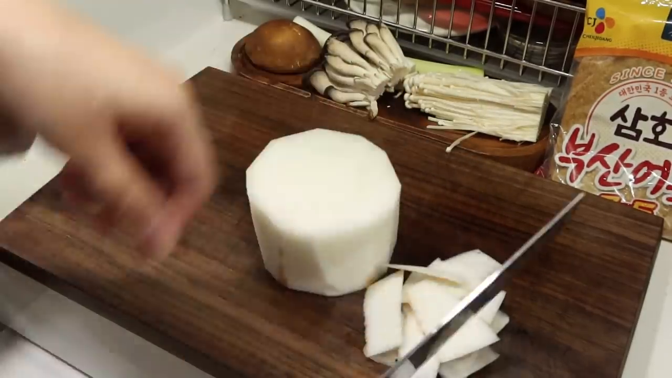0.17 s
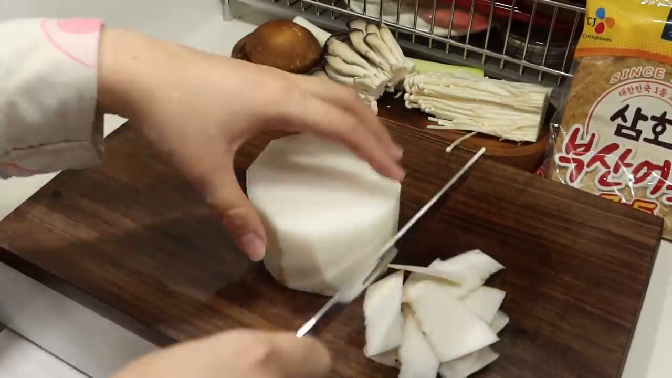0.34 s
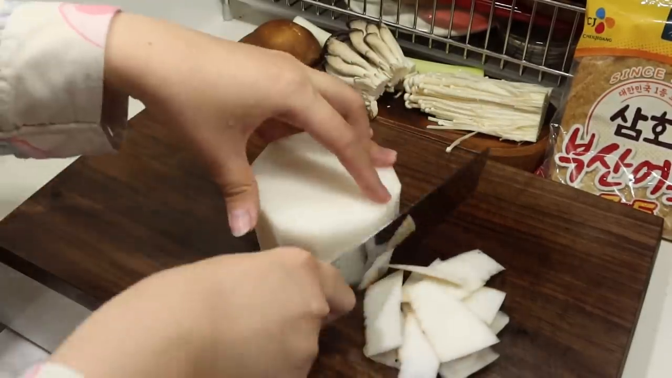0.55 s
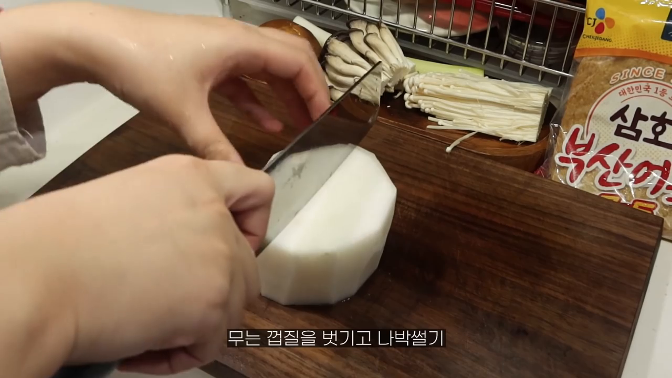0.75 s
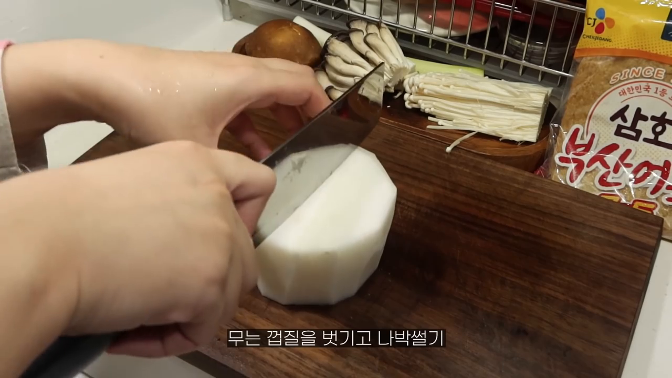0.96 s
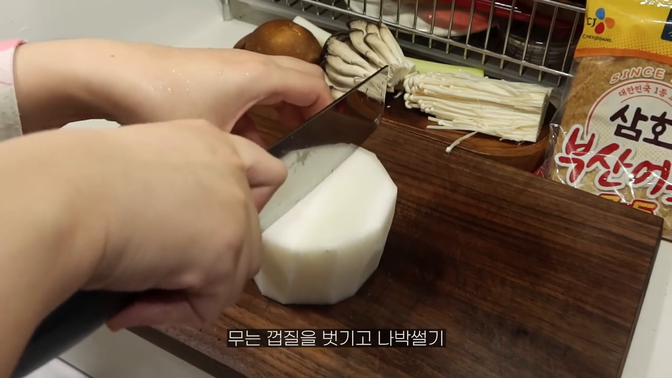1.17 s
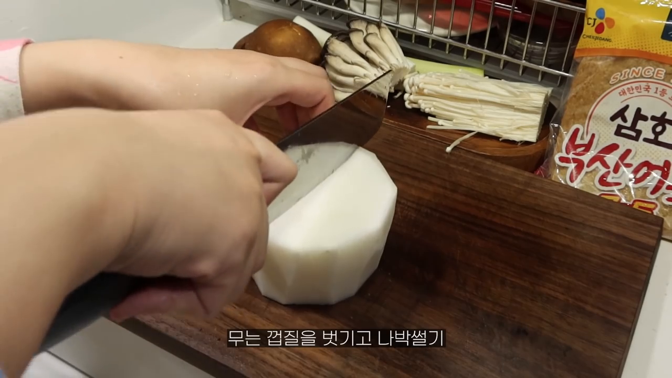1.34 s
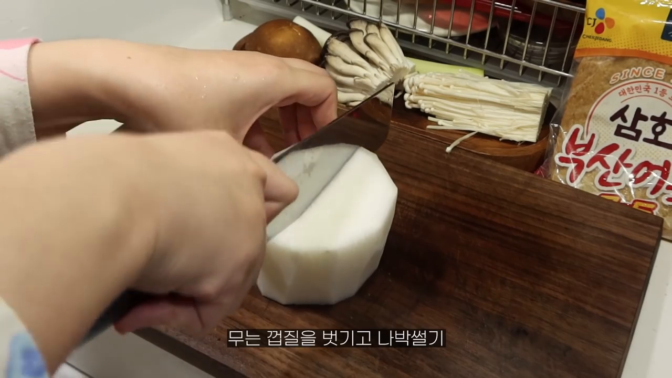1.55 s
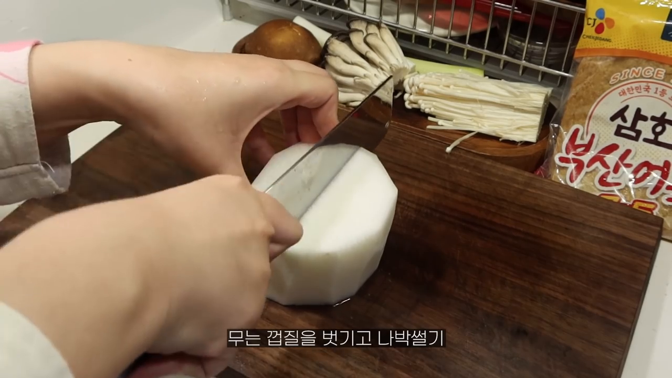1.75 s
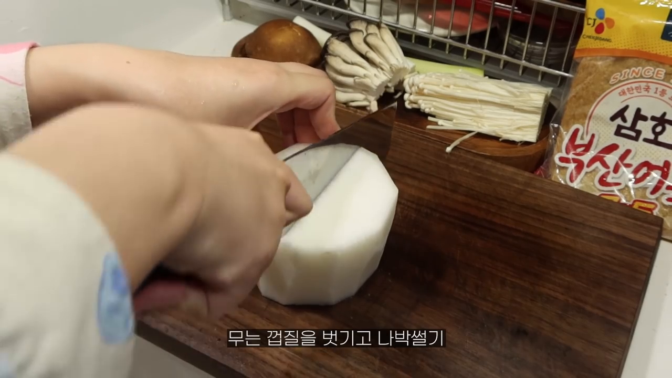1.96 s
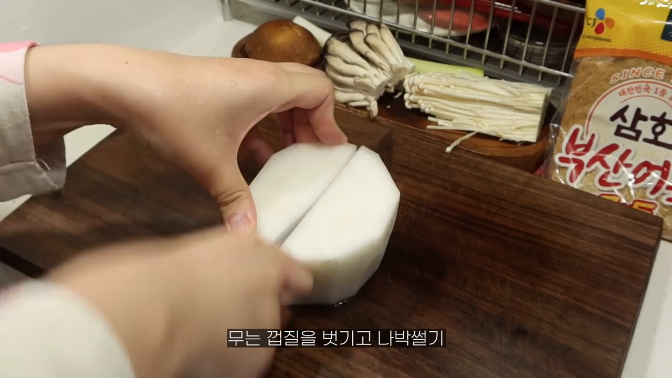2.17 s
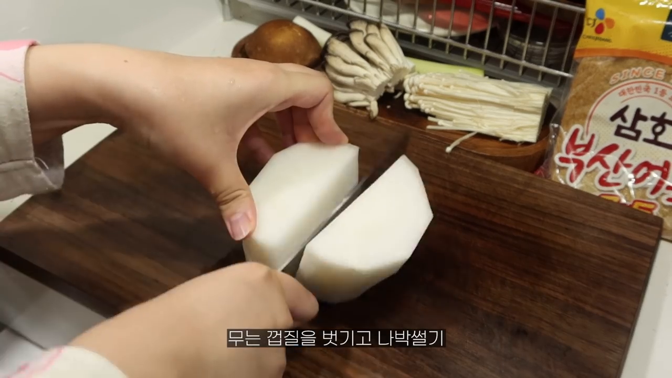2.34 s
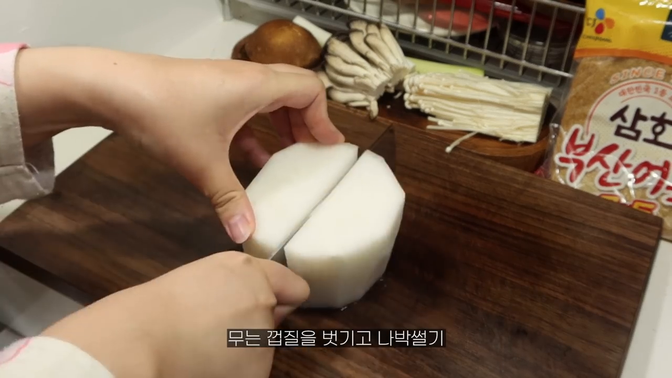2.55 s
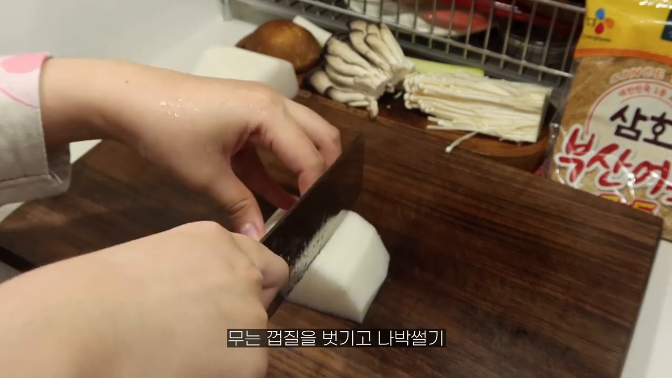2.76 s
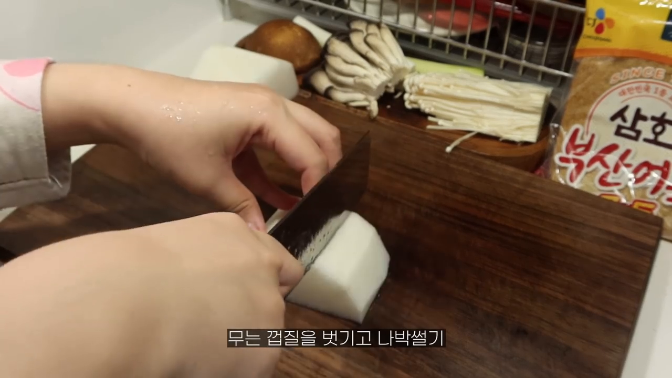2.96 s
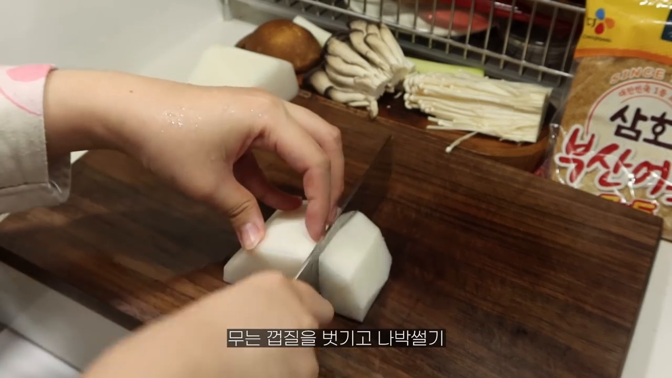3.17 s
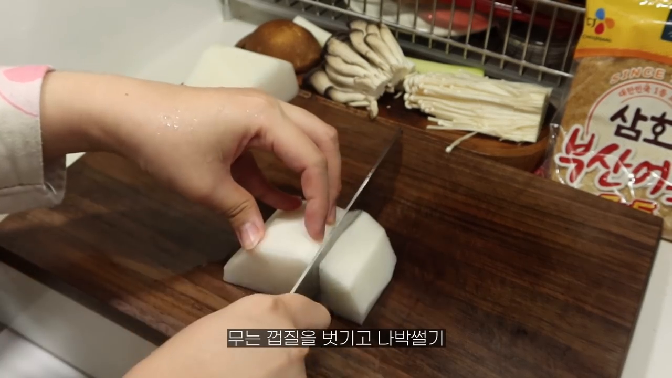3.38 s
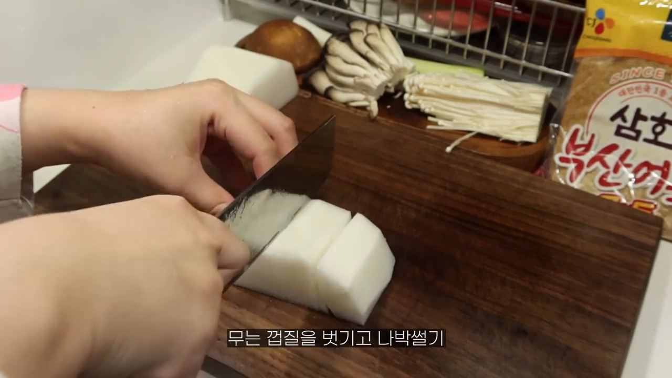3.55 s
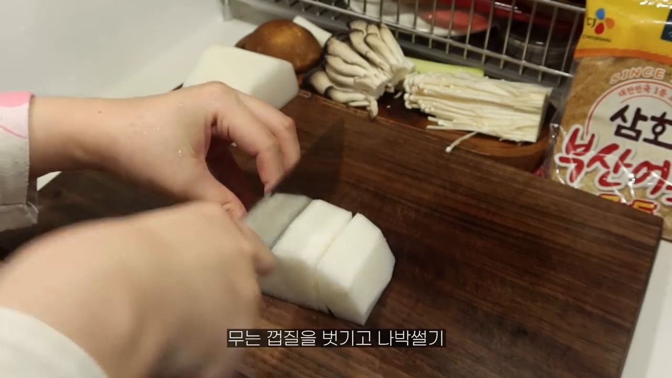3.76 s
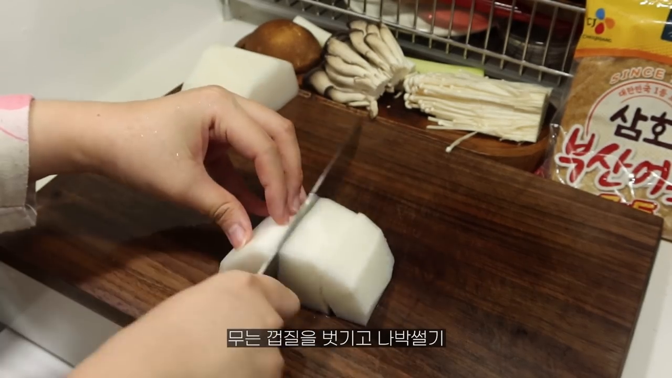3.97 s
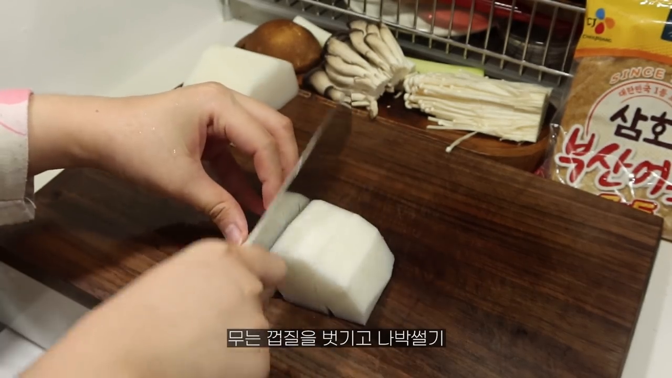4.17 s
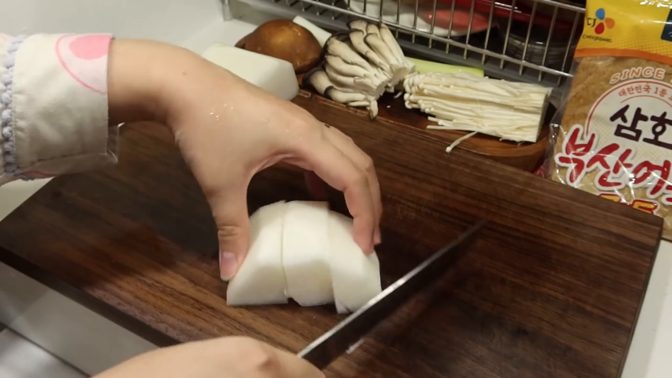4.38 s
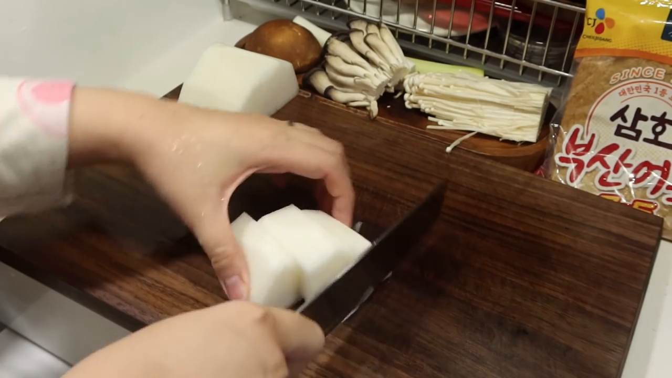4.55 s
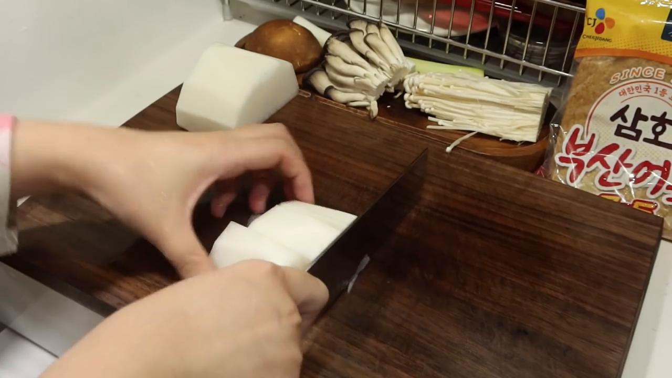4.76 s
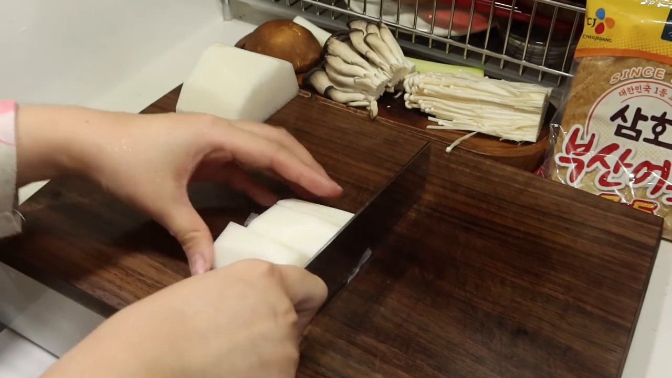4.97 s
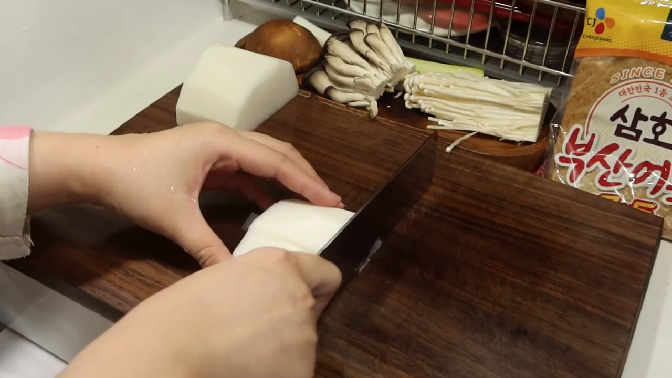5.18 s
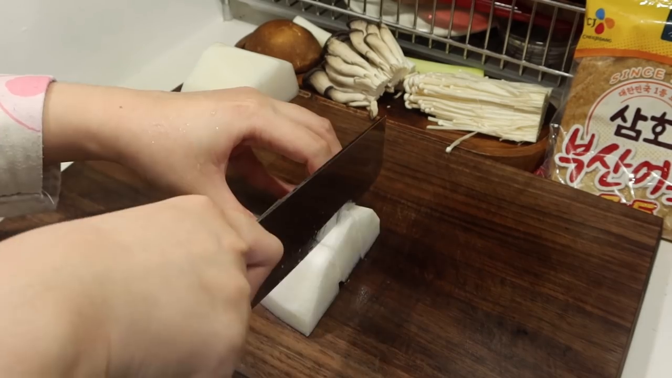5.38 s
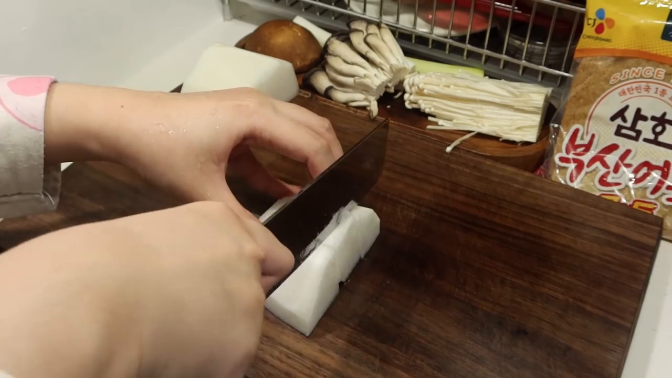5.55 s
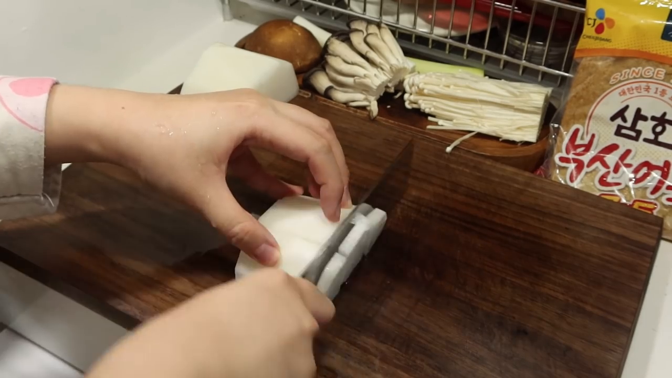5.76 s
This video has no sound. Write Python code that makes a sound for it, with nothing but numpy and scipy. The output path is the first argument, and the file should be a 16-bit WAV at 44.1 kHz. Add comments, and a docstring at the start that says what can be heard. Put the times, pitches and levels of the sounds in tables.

```python
"""In a kitchen, a knife saws through a thick raw radish and chops it on a wooden board, close to the microphone.
Cuts are swelling crunches of bursting cells, made of coloured random clicks; most end as the blade knocks
on the board, a sum of decaying modes set off by a brief push. Wet pieces tick (noise bursts), slide (random
clicks) and squeak (overtone stacks). Filtered noise and a mains hum lie beneath, and sparse taps give the echo.
The loud chops overload the recorder, whose limiter ducks and lets the kitchen's echo swell back."""
import sys
import numpy as np
from scipy import signal
from scipy.fft import rfft, irfft
from scipy.io import wavfile
from scipy.ndimage import uniform_filter1d

SR = 44100
rng = np.random.default_rng(int(sys.argv[2]) if len(sys.argv) > 2 else 0)


def log_audio(samples):
    """Write samples as a 16-bit WAV file to the path given in sys.argv[1]."""
    # one column per channel
    frames = np.atleast_2d(samples).T
    # limit to full scale, then quantise
    limited = np.clip(frames, -1, 1)
    pcm = np.round(limited * 32767).astype(np.int16)
    wavfile.write(sys.argv[1], SR, pcm)


N = 256662
TIME = np.arange(N) / SR  # s
MONO_FROM_S = 0.768  # the stereo image has closed by then
NOTCH_HZ = 305  # a dip in the knocks' spectrum, thinning them near 300 Hz


def gain_of(db):
    """Level to amplitude: 20 dB is a factor of ten."""
    return 10 ** (np.asarray(db) / 20)


def evened(x):
    """Normalization of the mean power: scales x to rms 1."""
    return x / np.sqrt(np.mean(x ** 2) + 1e-20)


def read(points, hz):
    """Interpolates a table on a logarithmic frequency axis."""
    f, value = np.transpose(points)
    return np.interp(np.log(hz + 1), np.log(f + 1), value)


def coloured(x, spectrum):
    """Spectral shaping: multiplies the Fourier spectrum of x by a curve, then sets rms 1."""
    hz = np.fft.rfftfreq(len(x), 1 / SR)
    return evened(irfft(rfft(x) * gain_of(read(spectrum, hz)), len(x)))


def add(mix, s, sound):
    """Superposition: mixes a sound in at time s."""
    part = mix[max(round(s * SR), 0):][:len(sound)]
    part += sound[:len(part)]


def grains(per_s, spread_db):
    """Shot noise: a random train of one-sample clicks of uneven size and random sign."""
    size = gain_of(spread_db * np.minimum(rng.exponential(1, N), 4))
    happens = rng.random(N) < per_s / SR
    return evened(size * rng.choice([-1., 1.], N) * happens)


def patchy(x, depth_db):
    """Time-varying resonance: wet gaps keep changing shape, so their resonances come and go."""
    z = signal.stft(x, nperseg=256)[2]
    field = uniform_filter1d(rng.standard_normal(z.shape), size=4, axis=0)  # smooth over frequency
    field = evened(uniform_filter1d(field, size=7, axis=1))  # and over time
    return evened(signal.istft(z * gain_of(depth_db * field), nperseg=256)[1][:N])


def arch(start, length):
    """Kinematics of a hand movement: speed, 0-1, gathers, peaks early and comes to rest."""
    skew, power = 0.67, 1.03
    done = np.clip((TIME - start) / length, 0, 1)
    return abs(np.sin(np.pi * done ** skew)) ** power


def smoothed(x, seconds):
    """First-order relaxation: follows x with a lag."""
    keep = np.exp(-1 / (seconds * SR))
    return signal.lfilter([1 - keep], [1, -keep], x)


def floor():
    """Stationary noise: room rumble and hiss, with a faint 60 Hz mains hum."""
    # spectrum of the quiet kitchen: frequency_hz, level_db (per Hz, relative)
    quiet_spectrum = [(20, -3), (55, -2.5), (90, 0), (150, 1), (280, -3), (450, -2.5), (650, -9.5),
                      (1200, -11), (3000, -15.5), (7000, -18.5), (12000, -22), (16000, -25.5)]
    air = gain_of(-51.5) * coloured(rng.standard_normal(N), quiet_spectrum)
    return air + gain_of(-62) * np.sin(2 * np.pi * (60 * TIME + rng.random()))


def blade():
    """Friction and fracture follow blade speed: strokes swell and fade, cuts grow until the blade is through."""
    # the blade drawn slowly to or fro in the flesh: start_s, length_s, crunch_db, drag_db (on the board, relative)
    strokes = [(0.552, 0.048, -46.5, -48), (1.466, 0.15, -39, -41), (1.608, 0.1, -31, -30),
               (1.704, 0.15, -38, -35), (1.823, 0.1, -42.5, -41), (1.94, 0.22, -39, -40),
               (2.234, 0.14, -28, -52), (2.93, .17, -57, -47.5), (5.575, 0.1, -58.5, -45.5),
               (5.686, 0.17, -38.5, -35.5)]
    # the blade pushed right through: through_s, length_s, split_s (how long before through the flesh splits),
    # final_crunch_db, final_drag_db (on the board, relative)
    cuts = [(0.071, 0.029, 0.0087, -26, -30.5), (0.625, 0.037, 0.0083, -33, -41),
            (2.265, 0.076, 0.049, -12, -29), (3.261, 0.22, 0.03, -11, -28),
            (3.919, 0.17, 0.038, -11.5, -27), (5.85, .19, 0.046, -15.5, -25)]
    enter_s, stop_s = .02, .002  # the edge bites in, and is stopped
    crunch_growth_db_per_s, drag_growth_db_per_s = 179, 105  # both grow as the blade gathers speed
    split_rise_s, split_db = 0.0073, 9.5  # the crunch jumps when the flesh splits
    crunch = sum(gain_of(db) * arch(start, length) for start, length, db, _ in strokes)
    drag = sum(gain_of(db) * arch(start, length) for start, length, _, db in strokes)
    for end, length, split, crunch_db, drag_db in cuts:
        to_go = np.maximum(end - TIME, 0)
        entering = np.clip((length - to_go) / enter_s, 0, 1)
        inside = entering * np.clip(1 - (TIME - end) / stop_s, 0, 1)
        unsplit = .5 + .5 * np.tanh((to_go - split) / split_rise_s)
        cut_db = crunch_db - crunch_growth_db_per_s * to_go - split_db * unsplit
        crunch = np.hypot(crunch, inside * gain_of(cut_db))  # powers add
        drag = np.hypot(drag, inside * gain_of(drag_db - drag_growth_db_per_s * to_go))
    return crunch, drag


def cutting(fast_db=-26):
    """Fracture noise: cells burst under the edge, densely when it runs fast; the blade's drag shakes the board."""
    # spectra of slow and fast cell bursts: frequency_hz, level_db (per Hz, relative)
    slow_crunch = [(530, -67.5), (900, -20), (1080, -3), (1420, -11), (2340, -3), (3110, -7), (3810, -3.5),
                   (4660, -9.5), (6140, -2.5), (8770, -10.5), (12300, -10), (15600, -22.5)]
    fast_crunch = [(350, -23), (600, -4.5), (1150, -8.5), (1450, -23.5), (1690, 2), (1830, -3), (2280, -1),
                   (3160, 5.5), (4560, -1.5), (4950, 1.5), (5450, 0), (6680, 2), (7660, -4), (12900, -13.5),
                   (15600, -46)]
    # the board's rumble while the hand presses on it: frequency_hz, level_db (per Hz, relative)
    rumble = [(60, -15.5), (150, -17), (310, -17), (400, -1), (465, 2.5), (520, -9), (600, -22), (720, -5),
              (1100, -19), (1600, -23), (3000, -31.5)]
    crunch, drag = blade()
    fast = crunch ** 2 / (crunch ** 2 + gain_of(fast_db) ** 2)  # share of power, half at fast_db
    slow_cells = coloured(grains(per_s=5000, spread_db=1.5), slow_crunch)
    fast_cells = coloured(grains(per_s=14000, spread_db=3), fast_crunch)
    cells = crunch * patchy(np.sqrt(1 - fast) * slow_cells + np.sqrt(fast) * fast_cells, depth_db=1.2)
    shake = patchy(coloured(grains(per_s=600, spread_db=1.5), rumble), depth_db=2.0)
    return cells + gain_of(-2.0) * drag * shake


def ringing(modes, travel):
    """Modal decay with dispersion: low bending waves arrive later (travel = s at 1 kHz)."""
    out = np.zeros(SR // 3)
    for hz, db, t60 in modes:
        t = np.maximum(TIME[:len(out)] - travel * np.sqrt(1000 / hz), 0)
        out += gain_of(db - 60 * t / t60) * np.sin(2 * np.pi * hz * t)
    return out / np.linalg.norm(gain_of([db for _, db, _ in modes]))


def board_rings():
    """Damping by contact: the board ringing freely, and with low modes muted by a leaning hand."""
    # modes of the board, on a counter that hums on faintly: frequency_hz, level_db (relative), t60_s
    board_modes = [(115, -7.5, 0.12), (157.6, -3, 0.038), (229, -30.5, 0.079), (448.7, -4.5, 0.07),
                   (483, -0.5, 0.067), (528.6, -1, 0.048), (724, 4, 0.036), (817, -3, 0.038),
                   (867, -9, 0.084), (1145, 3, 0.036), (1280, 3.5, 0.025), (1520, -5, 0.047),
                   (1670, 0, 0.038), (1730, -13, 0.019), (2300, -24, .03), (2780, -27, .03), (468, -41, 1),
                   (595, -39, 0.74), (750, -33.5, 0.52), (1430, -47, 0.57)]
    lean_db, lean_below_hz = -7, 500
    muted = [(hz, db + lean_db * (NOTCH_HZ < hz < lean_below_hz), t60) for hz, db, t60 in board_modes]
    return ringing(board_modes, travel=0.00011), ringing(muted, travel=0.00013)


def knocks():
    """Impact excitation: a brief push rings the board, which radiates little bass; steel adds a dry clatter."""
    # blade or piece meets the board: start_s, force_db (relative), hardness_hz (1 / contact time),
    # clatter_db (relative to the force)
    impacts = [(0.0667, -20, 2100, 4), (0.07, 0, 550, -16), (0.6172, -22.5, 820, -6),
               (0.6232, -2, 615, -31.5), (1.324, -15, 470, -25.5), (1.930, -24, 630, -36),
               (2.2611, 16, 2270, -13.5), (2.596, -11, 347, -40), (2.616, 0.5, 233, -52),
               (2.734, -17.5, 330, -35), (3.2540, 15.5, 2210, -16), (3.9127, 17.5, 2230, -17),
               (4.463, -20, 440, -43), (4.691, -14, 660, -21.5), (4.8937, 2.5, 1250, -27.5),
               (5.169, -11.5, 464, -44), (5.56, -19, 620, -26.5), (5.642, -21.5, 450, -34)]
    # steel chattering against the wood: frequency_hz, level_db (per Hz, relative)
    clatter_spectrum = [(300, -28.5), (750, 4), (1300, 9), (1900, 2.5), (2600, -5), (3600, -14),
                        (8000, -30)]
    clatter_t60, radiate_hz = .085, 350  # s; the board radiates little below radiate_hz
    lean_from_s, lean_to_s = 2.2, 2.4  # the cook leans on the blade to halve the radish
    board, pressed_board = board_rings()
    out, t = np.zeros(N), TIME[:len(board)]
    for s, force_db, hard_hz, clatter_db in impacts:
        ring = pressed_board if lean_from_s < s < lean_to_s else board
        push = np.sin(np.pi * np.minimum(t * hard_hz, 1)) ** 2
        chatter = coloured(rng.standard_normal(len(t)), clatter_spectrum)
        chatter = chatter * gain_of(clatter_db - 60 * t / clatter_t60)
        rung = signal.fftconvolve(ring, push / push.sum())[:len(t)]
        add(out, s, gain_of(force_db) * (rung + chatter))
    out = signal.lfilter(*signal.iirnotch(NOTCH_HZ, 2, fs=SR), out)
    return signal.sosfilt(signal.butter(2, radiate_hz, "high", fs=SR, output="sos"), out)


def echo(x, t60s, colour, start):
    """Reverberation: sparse reflections of random sign from a start time on, each band dying at its own speed."""
    taps = rng.choice([-1., 1.], SR) * (rng.random(SR) < 1 / 12) * (TIME[:SR] > start)
    hz, t, z = signal.stft(taps, SR, nperseg=256)
    z = z * gain_of(-60 * t / read(t60s, hz)[:, None])
    size = np.linalg.norm(signal.istft(z, SR, nperseg=256)[1])  # energy before colouring
    tail = signal.istft(z * gain_of(read(colour, hz))[:, None], SR, nperseg=256)[1]
    return signal.fftconvolve(x, tail / size)[:N]


def kitchen(x):
    """Early and late reflections: counter and wall, then the room's tail, a slow crossfade of three random tails."""
    # decay of the room's tail: frequency_hz, t60_s
    room_decay = [(100, 0.35), (500, 0.49), (1200, 0.39), (3000, 0.42), (7000, 0.4), (15000, 0.1)]
    near_decay = [(200, 0.15), (2000, 0.078), (10000, 0.14)]
    out = echo(x, near_decay, [(200, -4.5), (1200, -16), (4000, -11.5)], start=0.0017)
    tail_colour = [(100, -9.0), (400, -27.5), (1000, -19.5), (2500, -25.5), (7000, -20.0), (15000, -9.5)]
    for k in range(3):  # the tails trade places steadily at constant total power
        share = np.sqrt(2 / 3) * np.cos(np.pi * (TIME - k / 3))
        out += echo(x * share, room_decay, tail_colour, start=0.0077)
    return out


def sliding():
    """Stick-slip friction: fine sticking and slipping of wet flesh on skin, steel and wood."""
    # fingers and pieces slide over wet surfaces: start_s, length_s, level_db
    slides = [(0.842, .11, -61), (0.984, 0.082, -53.5), (1.162, 0.12, -52.5), (1.274, 0.15, -50),
              (2.577, 0.24, -53), (2.845, 0.19, -55), (4.406, 0.19, -47.5), (4.544, 0.29, -52),
              (4.754, 0.22, -48.5), (5.103, 0.27, -50.5)]
    # spectrum of the slips: frequency_hz, level_db (per Hz, relative)
    slide_colour = [(150, -8.5), (480, -4), (900, -2.5), (1000, -11), (1200, -6.5), (1370, -21),
                    (2170, -6.5), (3070, -7.5), (3590, -5.5), (3990, -14), (6060, -5), (12100, -17.5),
                    (15600, -34)]
    speed = sum(gain_of(db) * arch(start, length) for start, length, db in slides)
    slips = patchy(coloured(grains(per_s=1200, spread_db=4.5), slide_colour), depth_db=1.5)
    return speed * slips


def ticks(t60=0.066, snap_t60=0.0074, skirt_db=14):
    """Sudden release: a film of juice snaps, a sharp click and a short spatter around one pitch."""
    # cells and wet faces part: start_s, peak_db (relative), pitch_hz
    partings = [(0.869, -30, 4500), (1.196, -28, 5330), (1.3209, -26.5, 5240), (1.93, -26, 3410),
                (2.0611, -11, 4330), (2.5984, -22, 5600), (2.656, -17.5, 3260), (2.912, -24, 7250),
                (3.2181, -1, 6260), (4.311, -31, 6000), (4.375, -26.5, 5810), (4.6918, -24, 3270),
                (4.762, -29, 8200), (4.821, -33, 5420), (4.8771, -16.5, 5870), (5.164, -29.5, 7190),
                (5.212, -35, 6850), (5.25, -28.5, 6470), (5.399, -33, 6000), (5.5596, -29, 2530)]
    out, t = np.zeros(N), TIME[:2048]
    decay = gain_of(-60 * t / snap_t60) + gain_of(-5) * gain_of(-60 * t / t60)
    for s, peak_db, hz in partings:
        spectrum = [(500, -28), (hz / 2, -skirt_db), (hz, 0), (16000, -skirt_db)]
        tick = coloured(rng.standard_normal(len(t)), spectrum) * decay
        add(out, s, gain_of(peak_db) * tick / abs(tick).max())
    return gain_of(-5.5) * out


def squeaks():
    """Stick-slip oscillation: uneven slipping gives a faint, smeared stack of overtones."""
    # wet flesh pushed along: start_s, length_s, first_slips_per_s, last_slips_per_s, level_db
    pushes = [(4.441, 0.074, 650, 510, -48.5), (4.572, 0.088, 570, 600, -41.5),
              (4.656, 0.031, 800, 320, -42), (4.751, 0.033, 410, 490, -47.5), (5.103, 0.05, 350, 870, -50)]
    colour = [(800, -6), (1300, -6.5), (2300, -4), (3200, -8), (3550, 3), (3900, -11), (5800, -6.0), (8000, -10)]
    out = np.zeros(N)
    for s, length, first, last, db in pushes:
        n = round(length * SR)
        waver = .17 * evened(uniform_filter1d(rng.standard_normal(n), size=130))
        turns = np.cumsum(np.linspace(first, last, n) * (1 + waver)) / SR
        slips = sum(np.cos(2 * np.pi * k * turns) for k in range(2, 14))  # harmonics 2 to 13
        swell = np.sin(np.pi * np.arange(n) / n)
        add(out, s, gain_of(db) * coloured(slips, colour) * swell)
    return out


def scene():
    """Interchannel phase: the sound reaches two microphones out of step; each hears its own floor."""
    direct = cutting() + knocks() + sliding() + ticks() + squeaks()
    wide = TIME < MONO_FROM_S
    echoes = kitchen(direct) * gain_of(np.where(wide, -7, 0))
    mid = direct + echoes + floor() * gain_of(np.where(wide, -2.5, .5))
    quarter_cycle_off = signal.hilbert(direct).imag
    side = quarter_cycle_off + gain_of(-2.5) * floor()
    return np.array([mid + side, mid - side])


def record(dry, recovery_db_per_s=190):
    """Dynamic limiting: the image narrows to mono; a limiter catches chops late, so their first swing clips."""
    mid = dry.mean(0)
    x = mid + (dry - mid) * np.clip((MONO_FROM_S - TIME) / 0.041, 0, 1)
    power_db = 10 * np.log10(smoothed((x ** 2).mean(0), .003) + 1e-12)
    over_db = np.maximum(power_db + 5.5, 0)  # threshold at -5.5 dB
    fall = TIME * recovery_db_per_s
    held_db = np.maximum.accumulate(over_db + fall) - fall  # jumps up, recovers at a steady rate
    x = np.clip(x / gain_of(smoothed(held_db, .0005)), -1, 1)
    low_pass = signal.firwin(511, 15850, window=("kaiser", 9), fs=SR)  # upper band edge in Hz
    return signal.oaconvolve(x, low_pass[None], "same")


dry = scene()
out = record(dry)
log_audio(out)
```